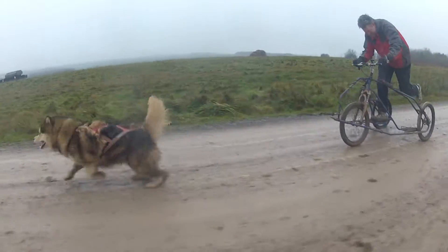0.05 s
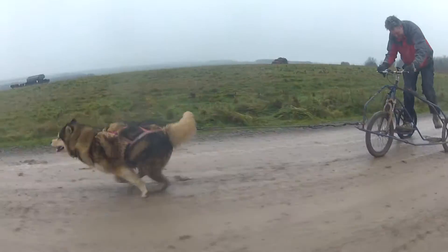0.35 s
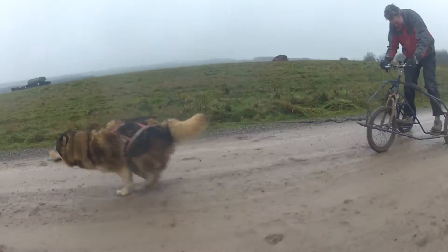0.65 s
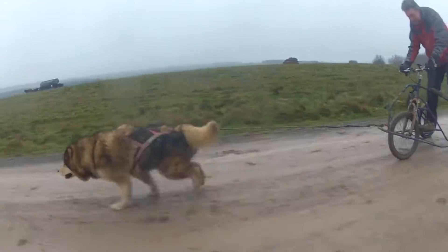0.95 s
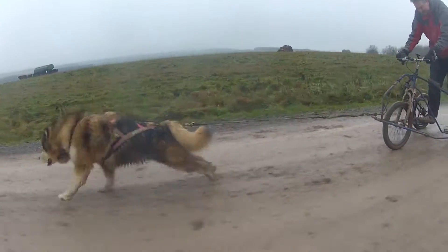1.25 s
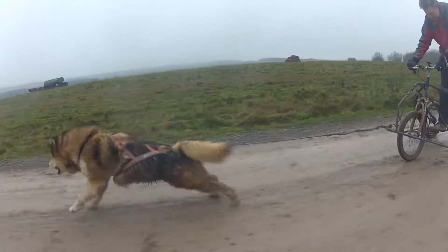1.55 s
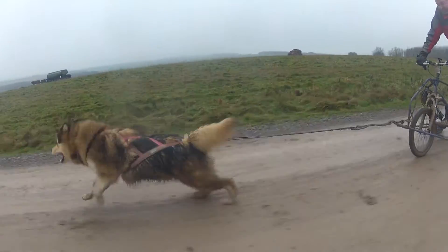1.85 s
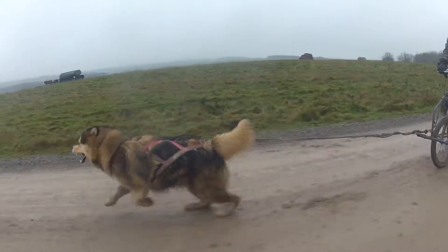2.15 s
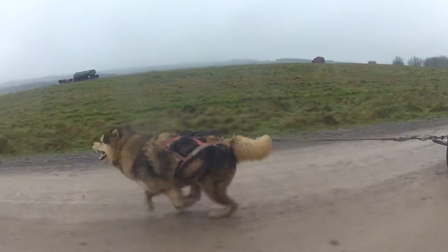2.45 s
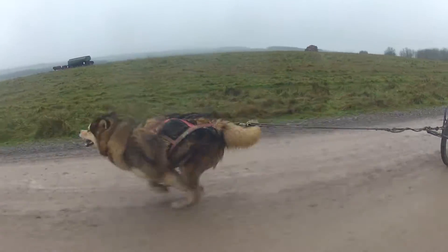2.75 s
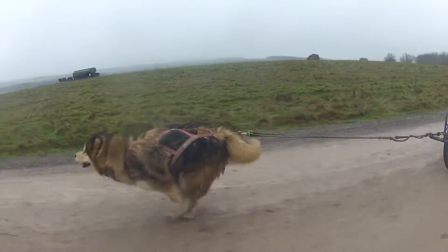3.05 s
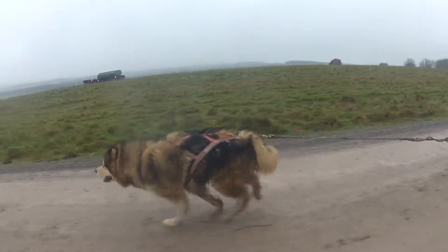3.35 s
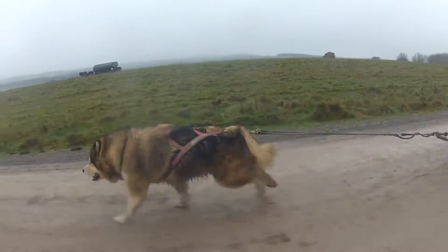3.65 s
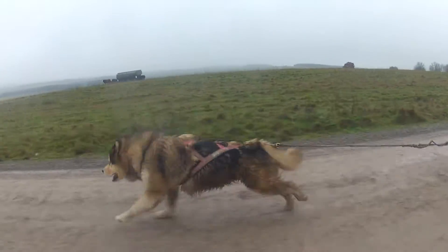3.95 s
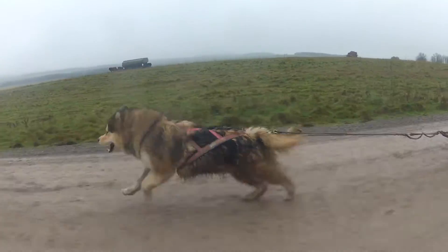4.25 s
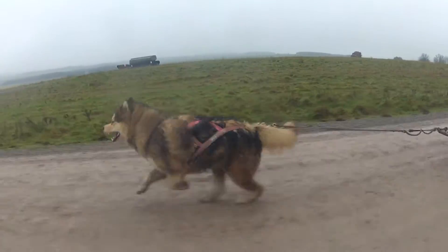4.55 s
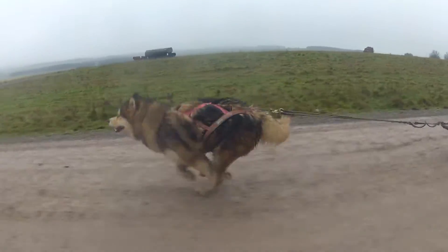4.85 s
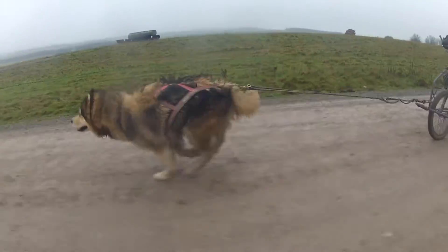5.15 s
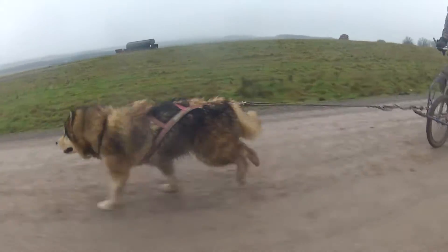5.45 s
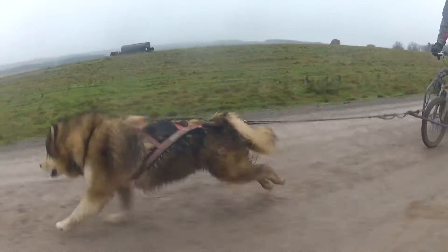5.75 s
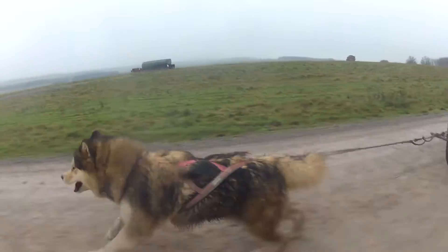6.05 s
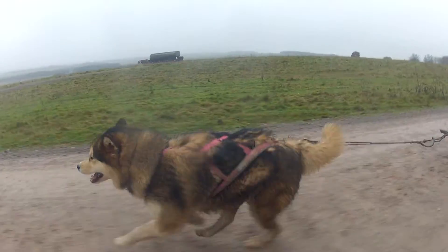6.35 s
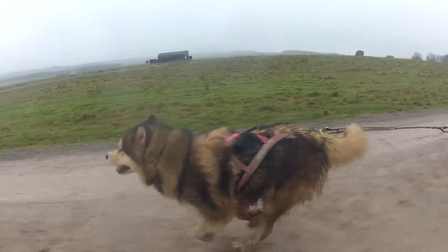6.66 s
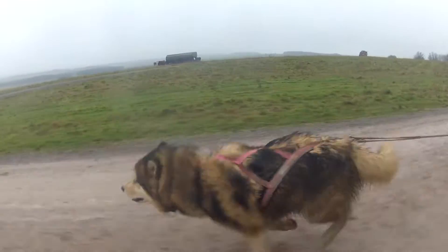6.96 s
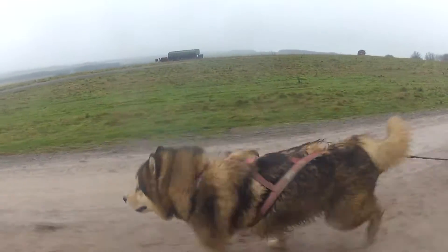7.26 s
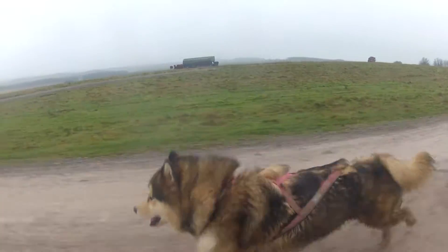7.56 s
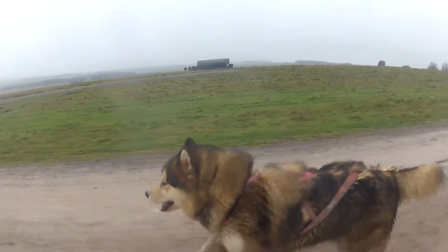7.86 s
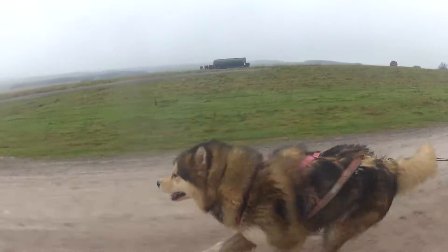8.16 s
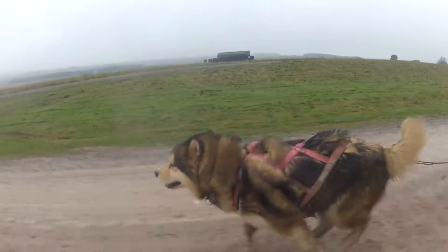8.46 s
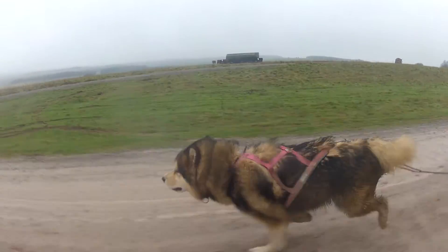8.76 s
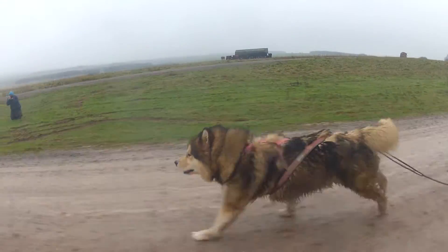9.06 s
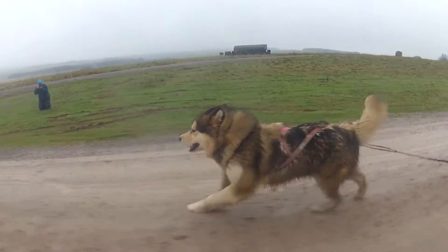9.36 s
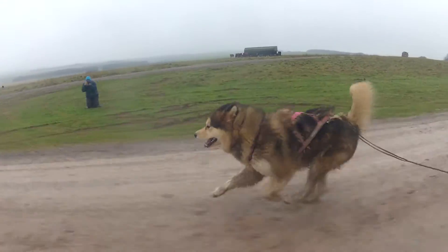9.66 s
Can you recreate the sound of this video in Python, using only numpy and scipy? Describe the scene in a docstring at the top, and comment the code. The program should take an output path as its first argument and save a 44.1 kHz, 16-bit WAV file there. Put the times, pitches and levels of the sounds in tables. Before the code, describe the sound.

A scooter rolls fast over a wet gravel track for about ten seconds, heard close up through a closed camera case, so everything sounds boxy and a little muffled. The frame drums steadily over a low rumble of air, growing louder during the first four seconds. Gravel crunches and mud crackles under the tyres, with coarser patches near 0.5 and 1.5 seconds. The case rattles and clacks irregularly on its mount several times a second, hardest at about 2.2, 5.3, 5.8, 9 and 9.3 seconds. Ruts add occasional dull thumps. Wet grit sprays against the case in short flurries from the start, and sharp ticks of hard grains come thickest between 5 and 9 seconds. At about 7 seconds a large stone jolts the frame with a knock and a faint metallic ping. The ride keeps its pace to the end.

```python
"""Dog scooter on wet gravel

A dog tows a scooter fast along a wet gravel track. The microphone rides close alongside, in a closed
camera case on a rig, and hears everything through frame and case. The tyres shake the frame, which
sways and drums; the case clacks on its mount at every stone, and wet grit flung up by the wheels
ticks against it. Underneath, gravel crunches and mud crackles under the tread."""
import sys
import numpy as np
from scipy import signal
from scipy.fft import rfft, irfft, next_fast_len
from scipy.io import wavfile
from scipy.ndimage import map_coordinates

SR = 44100
rng = np.random.default_rng(int(sys.argv[2]) if len(sys.argv) > 2 else 0)


def output_pcm(signal):
    """Save a mono or channel-first signal as 16-bit PCM at the path in sys.argv[1].

    Samples are clipped to [-1, 1] before scaling.
    """
    pcm = np.clip(np.atleast_2d(signal).T, -1, 1) * 32767
    wavfile.write(sys.argv[1], SR, np.round(pcm).astype(np.int16))


N = 432180

# big stones clack the case on its mount: (time [s], level [dB], main mode [Hz], treble snap [dB])
CLACKS = [(0.0554, -16.5, 1440, 3), (0.084, -14.5, 1440, 7), (0.404, -20, 1590, 9), (0.471, -11, 1640, 9.5),
          (0.52, -19, 1510, -2), (0.566, -19, 1480, 10), (0.697, -16, 1690, -4), (0.737, -15.5, 1560, 17.5),
          (1.119, -19.5, 1562, -4), (1.517, -16.5, 1540, -7), (1.1576, -13.5, 1610, -20),
          (1.316, -20.5, 1620, 0), (1.44, -15, 1540, -8), (1.5545, -15, 1620, -1), (1.5927, -11, 1540, -7),
          (1.741, -15, 1630, 4), (1.858, -9.5, 1620, 10), (1.865, -11.5, 1530, -3), (1.892, -20, 1540, -6),
          (1.964, -18.5, 1560, -7), (1.99, -15, 1570, 1.5), (2.2453, -1, 1590, 6.5), (2.537, -8, 1525, -6),
          (2.7847, -12, 1526, 1), (3.341, -15, 1510, 2), (3.347, -8.5, 1540, 5), (3.38, -17.5, 1500, -2),
          (3.7471, -10.5, 1610, 10.5), (3.9584, -12, 1530, -5), (4.052, -15.5, 1485, -8),
          (4.1847, -14, 1410, 4), (4.2667, -13.5, 1590, 0.5), (4.6978, -11, 1490, -12),
          (4.7377, -13, 1530, 7.5), (4.838, -19, 1560, 0), (4.8734, -13, 1506, 5.5),
          (4.982, -12.5, 1650, 6), (5.056, -15.5, 1640, 3.5), (5.165, -17.5, 1580, 6),
          (5.254, -15, 1560, -4), (5.2872, 0.5, 1620, -5), (5.4085, -10.5, 1590, -4),
          (5.4516, -15, 1450, 8.5), (5.492, -16, 1480, -2), (5.542, -16.5, 1500, 6), (5.681, -18, 1570, 7),
          (5.7718, -11.5, 1620, 2), (5.8487, -3.5, 1590, -4), (6.032, -23, 1550, -2),
          (6.07, -16.5, 1623, -1), (6.1432, -13, 1400, 0), (6.724, -17.5, 1550, -4),
          (6.824, -19, 1600, -17), (6.84, -19, 1620, 5), (6.9487, -12.5, 1430, 8), (7.07, -12, 1490, 4),
          (7.1001, -12.5, 1560, 2), (7.185, -14, 1560, 1), (7.237, -21, 1560, -2), (7.39, -22, 1480, 0),
          (7.425, -13.5, 1645, 1), (7.519, -19, 1530, -4), (7.5546, -8.5, 1530, -2),
          (7.7474, -13.5, 1560, -2), (7.877, -16.5, 1440, 0), (7.898, -15.5, 1530, 2),
          (7.9956, -13, 1560, -1), (8.025, -16, 1500, -5), (8.175, -19, 1620, 4), (8.197, -19.5, 1400, -2),
          (8.6057, -10.5, 1600, 3), (8.7561, -11.5, 1620, 3), (9.0263, -3.5, 1500, 7.5),
          (9.067, -16, 1500, 2), (9.0943, -15, 1570, -2), (9.3179, -8.5, 1520, -1),
          (9.3258, -4.5, 1560, -5), (9.4683, -16, 1520, 5)]
# the quick bounces of the case as it lands: (level [dB])
BOUNCES = [-10, 0, -4, -14]
# the ring of the plastic case round the microphone: (frequency [Hz], level [dB])
CASE_RING = [(350, -18.5), (550, -12.5), (675, -2), (770, -9), (930, -15), (1130, 1.5), (1290, -2.5),
             (1540, 2.5), (1850, -2), (2080, -19), (2400, -11.5), (2680, -28), (3550, -18), (4200, -42)]
# the roughness of the track, heard as rattle: (time [s], level [dB])
ROUGHNESS = [(0.0, -41), (0.41, -46.5), (0.54, -42), (2.05, -39), (2.21, -37.5), (2.7, -39), (5.51, -35.5),
             (6.96, -36.5), (7.23, -39), (8.08, -37.5), (9.25, -41.5), (9.8, -39.5)]
# the pace of the ride, heard as drumming of the frame: (time [s], level [dB])
PACE = [(0.0, -34.5), (0.6, -29.5), (1.3, -27.5), (1.6, -26.5), (2.5, -24.5), (3.3, -23.5), (3.9, -23),
        (4.5, -21.5), (4.85, -24), (5.15, -23), (5.7, -23), (6.3, -22), (7.0, -20.5), (7.45, -22),
        (7.8, -22), (8.2, -20.5), (8.82, -23), (9.8, -22)]
# the drumming frame: (frequency [Hz], level [dB])
FRAME_SPECTRUM = [(60, -17.5), (90, -13), (135, -9), (185, 0), (225, -1.5), (270, -0.5), (325, -8.5),
                  (385, -17.5), (520, -26.5), (900, -51), (2000, -75)]
# how hard the rig bobs: (time [s], level [dB])
SWAY_LEVEL = [(0.0, -30.5), (0.4, -25.5), (0.7, -39), (1.0, -25), (1.45, -34.5), (2.1, -27), (2.32, -37),
              (2.7, -33.5), (3.4, -25.5), (3.8, -31), (4.7, -25.5), (5.4, -27.5), (6.4, -26), (7.6, -27),
              (7.87, -26), (8.25, -22), (8.55, -26), (9.8, -27)]
# the low resonance of the rig: (frequency [Hz], level [dB])
SWAY_SPECTRUM = [(15, -89), (26, -16), (31, -0.5), (35, -0.5), (44, -8), (60, -19.5), (100, -5.5)]
# air rumbling past the case: (frequency [Hz], level [dB])
AIR_SPECTRUM = [(40, -3), (65, -2.5), (80, -2.5), (95, -2.5), (125, -5), (170, -15), (300, -61)]
# the rolling tyres: (frequency [Hz], level [dB])
ROLL_SPECTRUM = [(500, -46), (930, -5.5), (1080, 9.5), (1220, 10), (1330, 0.5), (1600, 7), (2050, -9),
                 (2400, -6), (2750, -33), (3500, -13.5), (4200, -81)]
# loose gravel crunching under the tread: (time [s], level [dB])
CRUNCH_LEVEL = [(0.0, -42.5), (0.6, -45), (2.5, -38.5), (3.5, -40.5), (5.6, -38.5), (7.3, -40.5),
                (9.8, -43.5)]
# the tone of that crunch: (frequency [Hz], level [dB])
CRUNCH_SPECTRUM = [(280, -15.5), (420, 0), (570, -1), (675, 5), (770, -9.5), (830, 1), (930, -25.5),
                   (1300, -46)]
# patches of coarser gravel: (time [s], half length [s], rise [dB])
COARSE_PATCHES = [(0.56, 0.14, 8.5), (1.517, 0.12, 7.5)]
# the wetness of the track, heard as spray of grit: (time [s], level [dB])
SPRAY_LEVEL = [(0.0, -57.5), (0.22, -74), (0.6, -72), (1.6, -62.5), (2.0, -70.5), (3.1, -66.5),
               (3.8, -64.5), (4.4, -58), (4.95, -62), (5.7, -59.5), (7.3, -62.5), (7.85, -60), (8.3, -52),
               (8.8, -60), (9.2, -61.5), (9.8, -63.5)]
# the wheels throw up showers of grit: (time [s], half length [s], rise [dB])
SHOWERS = [(0.1, 0.036, 10), (0.33, 0.098, 17), (0.67, 0.089, 12), (0.87, 0.033, 15), (1.3, 0.043, 2),
           (2.91, .05, 10), (3.26, 0.077, 7.5), (3.45, .03, 12), (3.6, 0.11, 6), (3.98, 0.14, 3),
           (4.94, 0.031, 9.5), (5.11, 0.14, 5), (5.52, .05, 9), (6.03, 0.04, 5), (6.3, 0.074, 7),
           (6.63, 0.047, 8.5), (6.87, 0.06, 2), (7.06, 0.11, 11.5), (7.47, .04, 9), (8.9, 0.068, 7.5),
           (9.59, 0.13, 7.5)]
# fine grit, heard from inside the case: (frequency [Hz], level [dB])
GRIT_SPECTRUM = [(400, -22.5), (1100, -10.5), (1700, 3), (2700, -6.5), (3200, -6.5), (3600, -1.5),
                 (4400, -8), (5000, -6.5), (5400, -3.5), (6000, -3), (7500, -50.5)]
# hard grains strike the case: (time [s], level [dB])
GRAIN_TICKS = [(0.306, -29), (0.3353, -36), (0.655, -35), (0.855, -34.5), (1.05, -35), (1.102, -34),
               (1.7795, -33), (2.183, -32), (2.6125, -34.5), (3.2051, -37), (3.303, -34), (3.561, -30.5),
               (3.6486, -30), (3.8796, -31), (4.1505, -34), (4.378, -30), (4.636, -39), (4.7616, -23),
               (4.9312, -18.5), (5.0025, -19.5), (5.0873, -21), (5.066, -27), (5.127, -26.5), (5.155, -30),
               (5.2469, -24), (5.2858, -18), (5.352, -26), (5.473, -13.5), (5.5052, -14.5), (5.5503, -27.5),
               (5.8212, -18.5), (6.132, -26), (6.1822, -29), (6.1913, -20.5), (6.2571, -28), (6.2693, -18),
               (6.303, -28), (6.321, -27), (6.3813, -28), (6.3937, -16.5), (6.777, -29), (6.797, -14.5),
               (6.904, -35), (7.164, -30), (7.2179, -28), (7.4474, -23.5), (7.459, -19.5), (7.686, -23.5),
               (7.761, -32), (7.811, -34), (7.8659, -27), (7.9324, -29), (7.9482, -18.5), (8.116, -22),
               (8.1329, -18), (8.31, -19.5), (8.378, -28.5), (8.3918, -22), (8.4314, -19), (8.4931, -26),
               (8.504, -23), (8.5379, -29), (8.56, -18), (8.679, -31), (8.743, -28), (8.779, -33),
               (8.882, -22), (8.902, -16.5), (9.51, -29.5), (9.5645, -23.5), (9.639, -28), (9.6578, -28.5)]
# the wall of the case, rung by a grain: (frequency [Hz], level [dB])
WALL_RING = [(400, -24), (1200, -4.5), (1800, -1), (2150, 4.5), (2700, -5.5), (3300, -3), (3600, 6.5),
             (3950, -1), (4500, 0.5), (5000, -8), (5400, -0.5), (5900, -14.5), (7200, -49)]
# large stones jolt the frame: (time [s], level [dB])
JOLTS = [(0.563, -14), (0.83, -16.5), (1.516, -14.5), (1.859, -16), (7.068, -5)]
# flung pebbles hit the frame: (time [s], level [dB])
PEBBLES = [(2.11, -16.5), (8.714, -16.5)]
# resonances of the camera bracket: (frequency [Hz], width [Hz], level [dB])
BRACKET_MODES = [(333, 210, -7), (508, 920, -17), (717, 53, -8)]
# resonances of the frame tube: (frequency [Hz], width [Hz], level [dB])
TUBE_MODES = [(1150, 180, 5), (1990, 230, 6), (2270, 100, 1.5), (2940, 370, -3), (3470, 110, -2),
              (5660, 310, -26)]
# the wheels drop into ruts: (time [s], level [dB], pitch [Hz])
RUT_THUMPS = [(0.825, -19, 93.5), (2.109, -11.5, 36), (3.439, -15, 66), (5.547, -12, 80),
              (7.41, -11.5, 133), (8.049, -18, 95)]
# the wetness of the mud, heard as slush: (time [s], level [dB])
SLUSH_LEVEL = [(0.0, -59), (0.24, -58), (0.36, -44), (0.9, -47.5), (1.5, -47), (1.95, -54), (2.67, -53.5),
               (4.3, -53), (5.02, -47), (8.65, -47), (9.2, -55), (9.8, -63)]
# slush under the tyres: (frequency [Hz], level [dB])
SLUSH_SPECTRUM = [(1500, -25), (2200, 5.5), (2900, 3), (3700, -2.5), (4600, -6), (5600, -19)]
# the ring of a small steel fitting: (frequency [Hz], level [dB], time to fall 60 dB [s])
FITTING_MODES = [(4441, 0, .12)]


def case_clacks(rattle_db):
    """Right at the microphone: at each stone the case scrapes, lifts and bounces back on its mount."""
    case_hz, snap_hz, snap_width_hz = 1550, 2090, 250  # main mode; a sharp contact lifts the treble
    lead_in_s, lead_in_db = .0027, -5.5  # a light touch ahead of the main contact
    out, t = np.zeros(N), np.arange(SR // 20) / SR - .01
    scrape = np.exp(np.minimum(t / 0.001, -t / 0.0035))
    small_stones = [(s, db, case_hz * np.exp(0.098 * rng.standard_normal()), 3.5 * rng.standard_normal())
                    for s, db in scattered(rattle_db + 13.5, per_second=8, spread_db=2)]
    treble = lambda f: (1 + np.tanh((f - snap_hz) / snap_width_hz)) / 2
    for s, db, hz, snap_db in [*CLACKS, *small_stones]:
        # a tighter contact rings higher, and each one favours other modes
        body = ring([(f * np.sqrt(hz / case_hz), level + snap_db * treble(f) + rng.normal(0, 2.23))
                     for f, level in CASE_RING])
        push = .11 * amp(-0.23 * db) * scrape * rng.standard_normal(len(t))  # hard blows are cleaner
        bounce_s = np.cumsum(rng.uniform(.85, 1.15, len(BOUNCES))) / hz  # in step with the main mode
        contact_s = np.append(-lead_in_s * rng.uniform(.7, 1.3), bounce_s - bounce_s[1])
        contact_db = np.append(lead_in_db, BOUNCES) + rng.normal(0, 2.2, len(contact_s))
        push[np.searchsorted(t, contact_s)] += amp(contact_db)
        add(out, s, signal.fftconvolve(push, body), db - 0.4)
    return out


def rig_shake():
    """The rig bobs at its lowest resonance, the track drums the frame, and air rumbles past the case."""
    sway_db = curve(SWAY_LEVEL) + 5.5 + 1.5 * wobble(per_second=8)  # ruts swell the sway and drumming
    drum_db = curve(PACE) + 2 + 1.61 * wobble(per_second=16)
    bob = signal.hilbert(noise(SWAY_SPECTRUM))
    swing = bob.real / (abs(bob) + 3.3)  # the tyres limit the swing
    sway = unit(lowpass(swing, hz=75, order=6))
    air = amp(drum_db - 8.5 + wobble(per_second=4)) * noise(AIR_SPECTRUM)
    return amp(sway_db) * sway + amp(drum_db) * noise(FRAME_SPECTRUM) + air


def tyres(rattle_db):
    """Close by, gravel rolls and crunches under the tread; its bumps keep the mount chattering."""
    coarse_db = swells(COARSE_PATCHES)
    lumps = 1.97 * np.tanh(wobble(per_second=90))  # the same lumps drive the roll and the crunch
    roll = amp(rattle_db - 0.6 + 0.19 * coarse_db + 2.5 * lumps) * noise(ROLL_SPECTRUM)
    bumps = impacts(per_second=70, spread_db=3)
    bursts = signal.fftconvolve(bumps, np.exp(-np.arange(SR // 40) / SR / 0.0035))[:N]
    tread = rung_noise(1 + unit(bursts), CRUNCH_SPECTRUM)
    crunch = amp(curve(CRUNCH_LEVEL) + coarse_db + 0.99 * lumps) * tread
    rattle = amp(rattle_db - 5.5 + 0.55 * coarse_db) * rung_noise(bursts, CASE_RING)
    return roll + crunch + rattle


def wet_grit():
    """Grit lands on the case in flurries: a rasping spatter, a hiss, and hard grains that snap."""
    drop_s, strike_s, splash_s = .0014, .0008, .005  # decay times
    spray_db = curve(SPRAY_LEVEL) + 2.5 + swells(SHOWERS) + 2 * wobble(per_second=14)
    clumps = amp(9 * np.tanh(wobble(per_second=60)))
    drop = np.exp(-np.arange(SR // 100) / SR / drop_s)
    drops = signal.fftconvolve(impacts(per_second=380, spread_db=3) * clumps, drop)[:N]
    spatter = amp(spray_db + 4) * rung_noise(drops, GRIT_SPECTRUM)
    mist = amp(spray_db - 4.5) * noise(GRIT_SPECTRUM)
    out, t = spatter + mist, np.arange(SR // 20) / SR - .02
    for s, db in [*GRAIN_TICKS, *scattered(spray_db + 17, per_second=14, spread_db=3.5)]:
        pitch = np.exp(.035 * rng.standard_normal())
        wall = ring([(hz * pitch, level + rng.normal(0, 1.8)) for hz, level in WALL_RING])
        wetness = min(.028 * amp(-.55 * db), .5)  # the weaker the grain, the more of it is mud
        splash = wetness * np.exp(np.minimum(t / 0.002, -t / splash_s)) * rng.standard_normal(len(t))
        strike = (t >= 0) * np.exp(-abs(t) / strike_s) * rng.standard_normal(len(t))
        add(out, s + strike_s, signal.fftconvolve(strike + splash, wall), db)
    return out


def frame_knocks():
    """Large stones thump the camera bracket; flung pebbles snap against the frame tube."""
    out = np.zeros(N)
    for s, db in JOLTS:
        blow = lowpass(chatter(spread_s=0.00299), hz=700, order=4)
        add(out, s + 0.0013, resonate(blow, BRACKET_MODES), db)
        tube = resonate(chatter(spread_s=0.0019), TUBE_MODES)  # the blow also reaches the tube
        add(out, s + 0.00296, tube, db - 17)
    for s, db in PEBBLES:
        push = chatter(spread_s=0.00056)
        t = (np.arange(len(push)) - np.flatnonzero(push)[0]) / SR
        scrape = 0.21 * np.exp(-abs(t) / 0.002) * rng.standard_normal(len(t))
        rasp = 0.58 * signal.fftconvolve(scrape, ring(GRIT_SPECTRUM))[:len(t)]
        add(out, s, resonate(push + scrape, TUBE_MODES) + rasp, db)
    return out


def rut_thumps():
    """A tyre drops into a rut and the rig swings briefly, with a dull thump."""
    rise_s, decay_s = .01, .014
    out, t = np.zeros(N), np.arange(SR // 5) / SR - .05
    swing = np.exp(np.minimum(t / rise_s, -t / decay_s))
    for s, db, hz in RUT_THUMPS:
        add(out, s, lowpass(swing * np.sin(2 * np.pi * hz * t), hz=300, order=4), db)
    return out


def slush():
    """Down at the wheels, wet mud squeezes out from under the tread with a coarse crackle."""
    crackle_db = 5 * wobble(per_second=120)
    return amp(curve(SLUSH_LEVEL) - 9.5 + crackle_db) * noise(SLUSH_SPECTRUM)


def fitting_ping():
    """Faint in the background, a small steel fitting rings at the hardest jolt."""
    out, t = np.zeros(N), np.arange(SR // 5) / SR
    ping = sum(amp(db - 60 * t / t60) * np.sin(2 * np.pi * hz * t) for hz, db, t60 in FITTING_MODES)
    add(out, s=7.079, sound=ping, db=-37.5)
    return out


def amp(db):
    """Decibels to gain."""
    return 10 ** (np.asarray(db) / 20)


def unit(x):
    """x at rms 1."""
    return x / np.sqrt(np.mean(x ** 2) + 1e-20)


def curve(rows):
    """One level per sample from rows of (time [s], level [dB])."""
    return np.interp(np.arange(N) / SR, *np.transpose(rows))


def swells(rows):
    """The summed rise of bell-shaped swells (time [s], half length [s], rise [dB])."""
    return sum(db * np.exp(-((np.arange(N) / SR - s) / half) ** 2) for s, half, db in rows)


def wobble(per_second):
    """A smooth curve through evenly spaced random knots."""
    knots = rng.standard_normal(int(N * per_second / SR) + 4)
    coarse = np.arange(0, N + 32, 32)
    return np.interp(np.arange(N), coarse, map_coordinates(knots, [coarse * per_second / SR]))


def impacts(per_second, spread_db):
    """Randomly timed positive impulses of unequal size."""
    sizes = amp(spread_db * np.clip(rng.standard_normal(N), -2, 2)) * rng.choice([-1, 1], N)
    return (rng.random(N) < per_second / SR) * abs(sizes)


def scattered(level_db, per_second, spread_db):
    """Loosely spaced events (time [s], level [dB]), scattered round a level curve."""
    count = int(per_second * N / SR)
    s = (np.arange(count) + rng.random(count)) / per_second
    return np.transpose([s, level_db[(s * SR).astype(int)] + spread_db * rng.standard_normal(count)])


def chatter(spread_s, count=5):
    """One firm contact followed by a few lighter ones, about spread_s apart."""
    push, first = np.zeros(SR // 12), SR // 100
    push[first] = 1
    late_s = np.clip(np.cumsum(rng.exponential(spread_s, count)), 0, .05)
    rebounds = rng.normal(0, 0.54, count) * np.exp(-late_s / (4 * spread_s))
    push[first + (late_s * SR).astype(int) + 1] += rebounds
    return push


def add(track, s, sound, db):
    """Put a sound into the track so that its peak has level db and falls at time s."""
    top = np.argmax(abs(sound))
    start = max(round(s * SR) - top, 0)
    room = track[start:start + len(sound)]
    room += (amp(db) * sound / abs(sound[top]))[:len(room)]


def filtered(x, response):
    """x through a complex frequency response."""
    size = next_fast_len(2 * len(x), True)
    return irfft(rfft(x, size) * response(np.fft.rfftfreq(size, 1 / SR)), size)[:len(x)]


def lowpass(x, hz, order):
    """x rolled off above hz."""
    return filtered(x, lambda f: 1 / (1 + (f / hz) ** order))


def resonate(x, modes):
    """x rung through modes (frequency [Hz], width [Hz], level [dB]) of alternating sign."""
    return filtered(x, lambda f: sum(
        (-1) ** k * amp(db) * 1j * f * width / (hz * hz - f * f + 1j * f * width)
        for k, (hz, width, db) in enumerate(modes)))


def shape(spectrum):
    """The gain of points (frequency [Hz], level [dB]) joined on a log axis."""
    f, db = np.transpose(spectrum)
    return lambda hz: amp(np.interp(np.log(hz + 1), np.log(f), db, right=-120))


def noise(spectrum):
    """Noise of rms 1 with the given spectrum."""
    return unit(filtered(rng.standard_normal(N), shape(spectrum)))


def ring(spectrum, size=2048, fade_s=.012):
    """The causal impulse response of a spectrum, faded out quickly so it sounds short and dry."""
    cepstrum = irfft(np.log(shape(spectrum)(np.fft.rfftfreq(size, 1 / SR)) + 2.5e-3))
    cepstrum[1:size // 2] *= 2  # fold to minimum phase
    cepstrum[size // 2 + 1:] = 0
    return irfft(np.exp(rfft(cepstrum))) * np.exp(-(np.arange(size) / SR / fade_s) ** 2)


def rung_noise(envelope, spectrum):
    """Noise that follows an envelope and rings a body with the given spectrum, at rms 1."""
    return unit(signal.fftconvolve(envelope * rng.standard_normal(N), ring(spectrum))[:N])


def limiter(x, limit_db=-6, attack_s=0.0014, release_db_per_s=36):
    """A peak over the limit turns the recorder down; the gain then climbs back at a steady rate."""
    over_db = np.maximum(20 * np.log10(abs(x) + 1e-9) - limit_db, 0)
    climb_db = release_db_per_s * np.arange(N) / SR
    cut_db = np.maximum.accumulate(over_db + climb_db) - climb_db
    pole = np.exp(-1 / (attack_s * SR))
    return x * amp(-signal.lfilter([1 - pole], [1, -pole], cut_db))


def scene():
    """The ride in mono, as it reaches the microphone through the frame and the case."""
    rattle_db = curve(ROUGHNESS) - 1
    shaking = rig_shake() + rut_thumps()
    stones = tyres(rattle_db) + case_clacks(rattle_db) + frame_knocks() + fitting_ping()
    spray = wet_grit()
    return (shaking + stones + slush() + spray)[None]


def record(dry):
    """The camera ducks and rounds off the hardest clacks; its slow sample clock adds a thin fizz."""
    ceiling, clock_hz, top_hz = .62, 12000, 15800
    ducked = limiter(dry[0])
    rounded = ducked / (1 + (ducked / ceiling) ** 6) ** (1 / 6)
    low = filtered(rounded, lambda hz: 1 / np.sqrt(1 + (hz / 5570) ** 60))
    # holding each sample mirrors the sound round the clock frequency
    mirrored = 2 * low * np.cos(2 * np.pi * clock_hz * np.arange(N) / SR)
    fizz = amp(0.5) * filtered(mirrored, lambda hz: abs(hz - clock_hz) / np.maximum(hz, clock_hz / 2))
    return filtered(low + fizz, lambda hz: (hz < top_hz) / np.sqrt(1 + (hz / 14600) ** 50))[None]


dry = scene()
out = record(dry)
output_pcm(out)
```